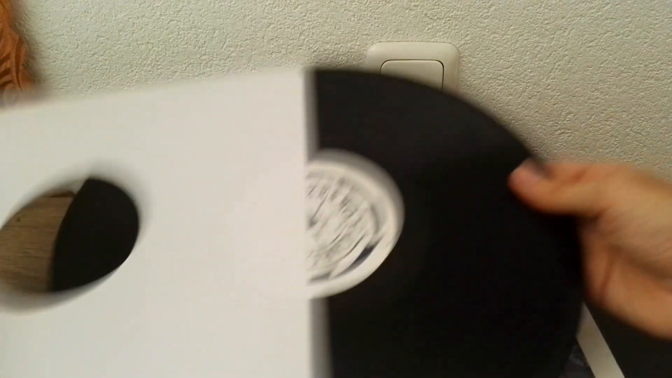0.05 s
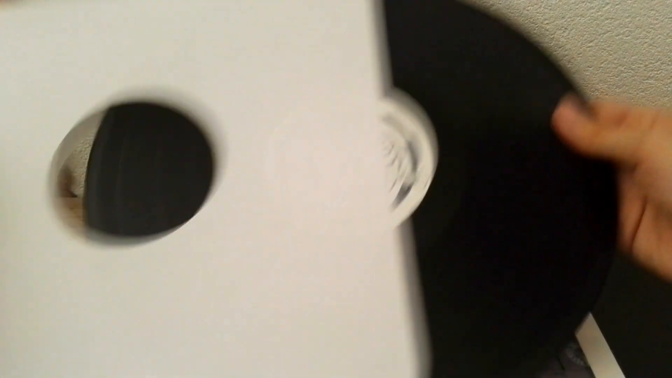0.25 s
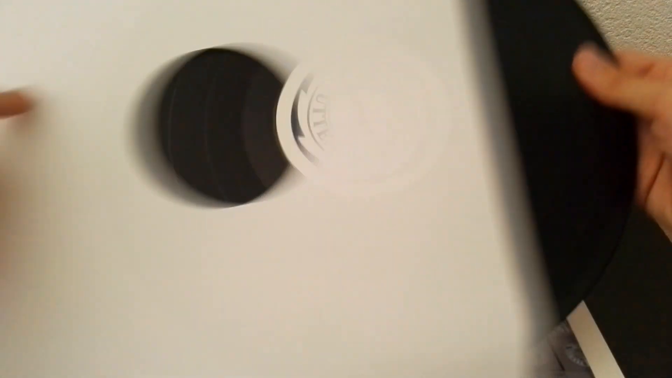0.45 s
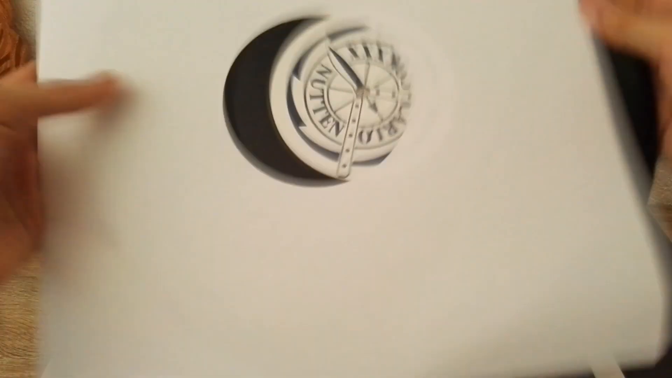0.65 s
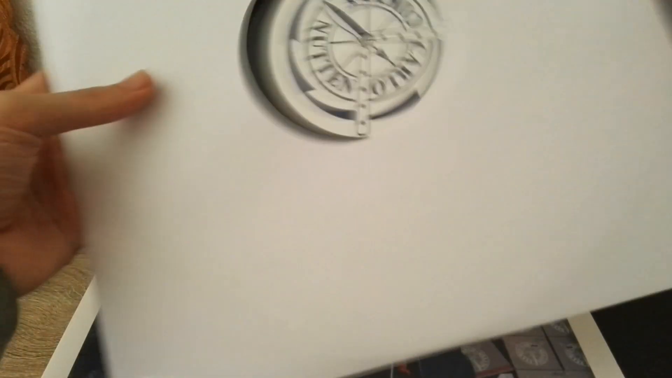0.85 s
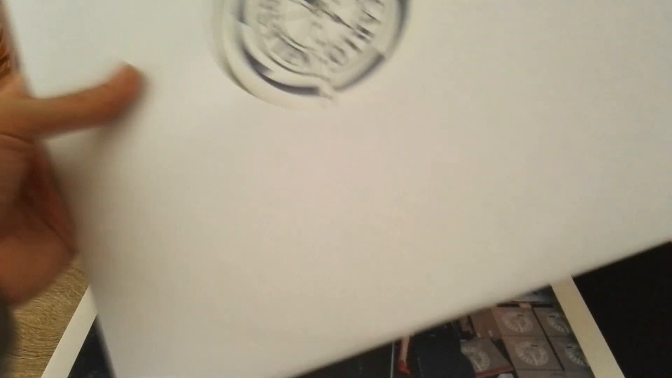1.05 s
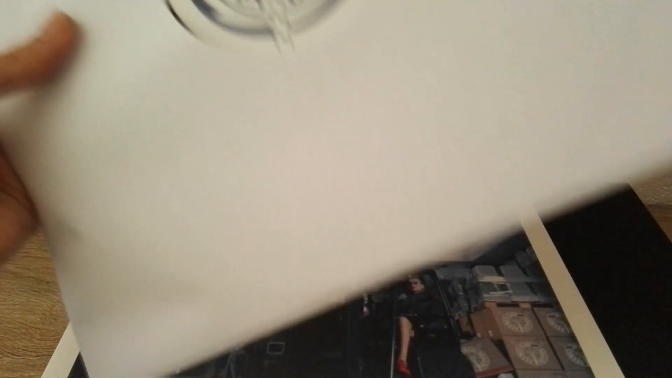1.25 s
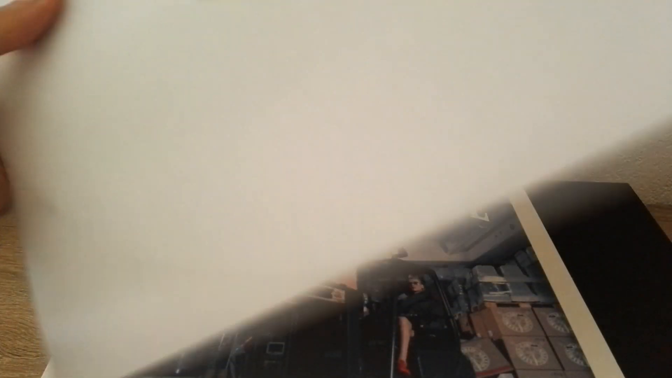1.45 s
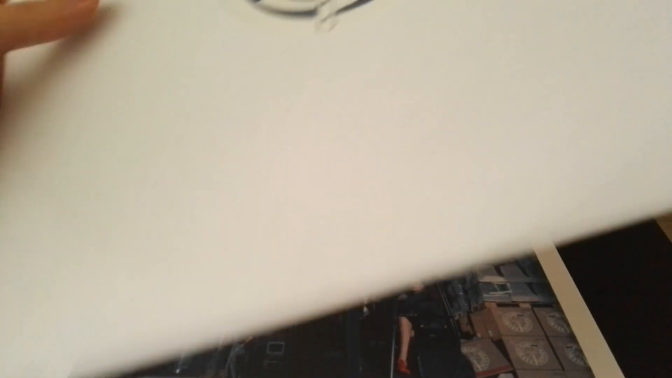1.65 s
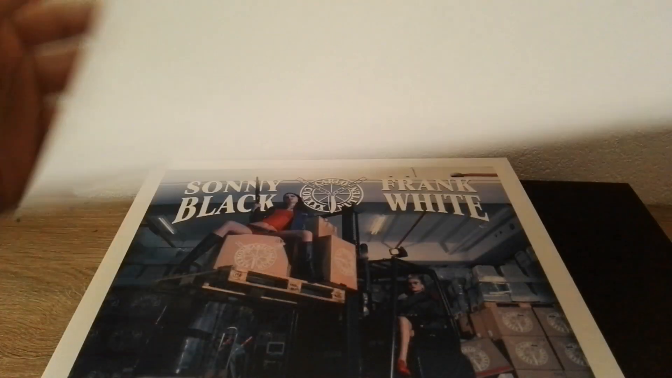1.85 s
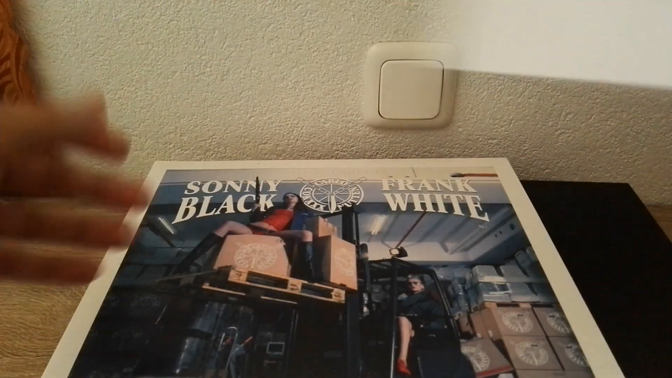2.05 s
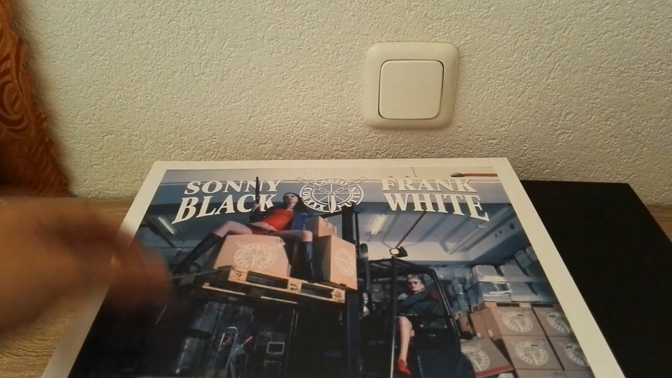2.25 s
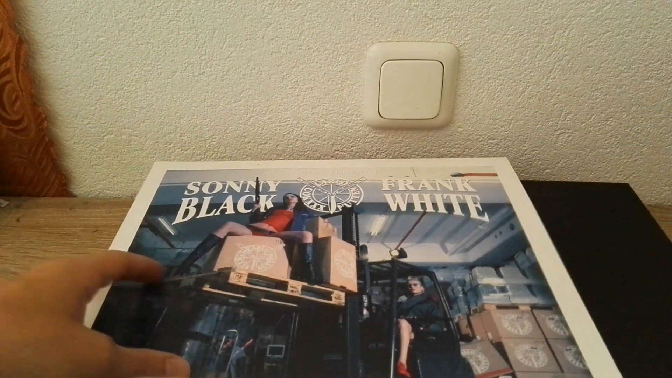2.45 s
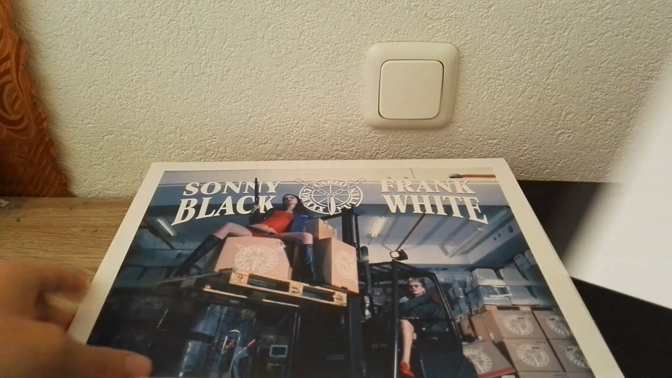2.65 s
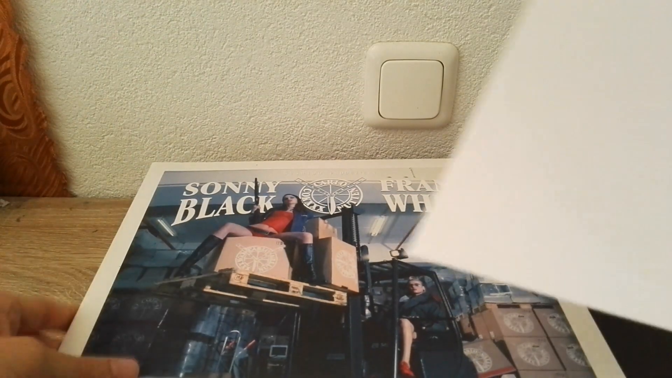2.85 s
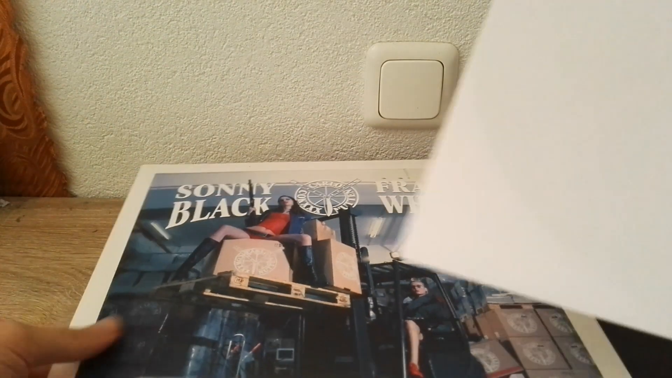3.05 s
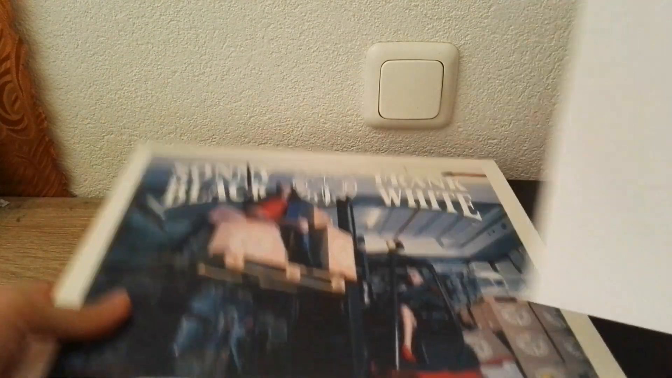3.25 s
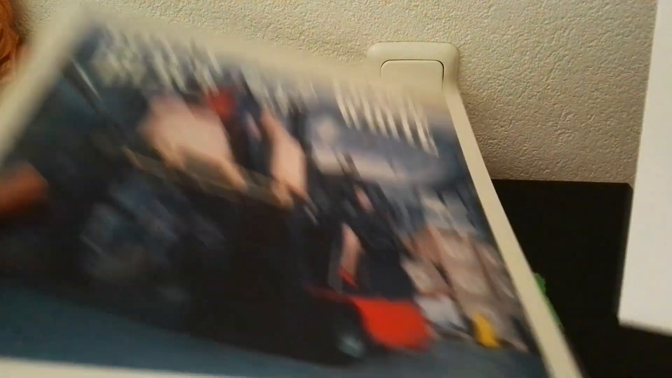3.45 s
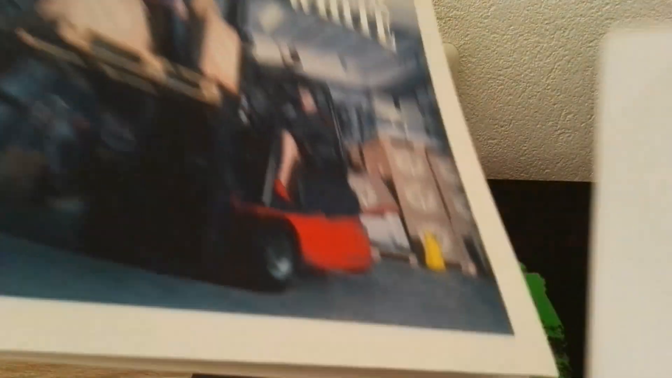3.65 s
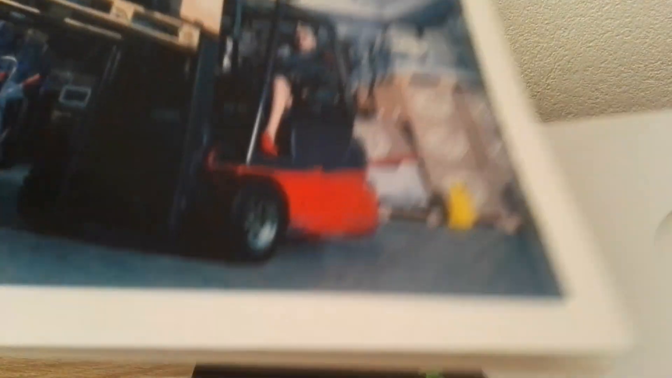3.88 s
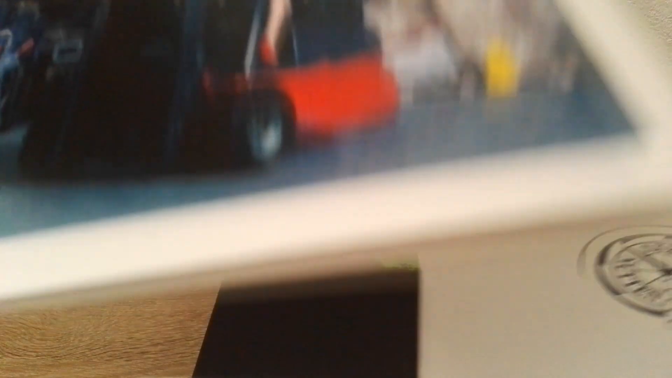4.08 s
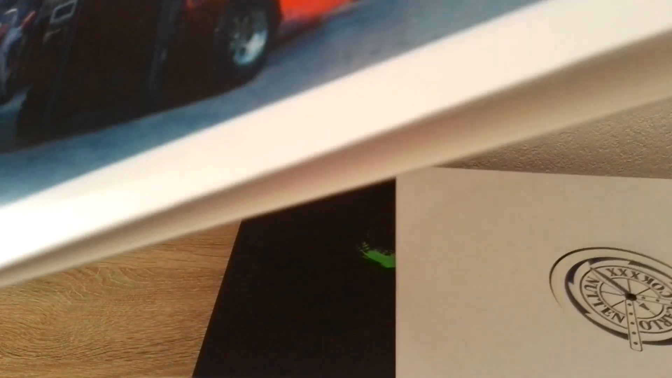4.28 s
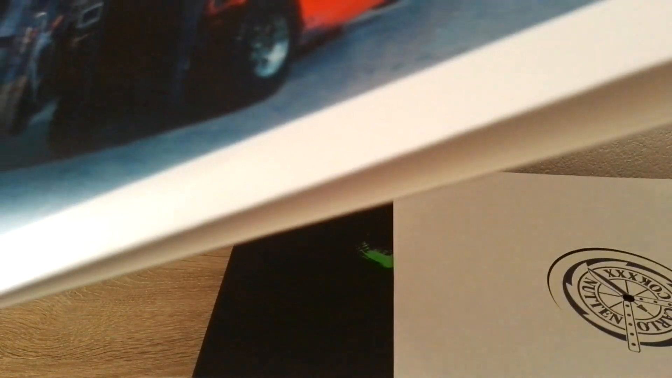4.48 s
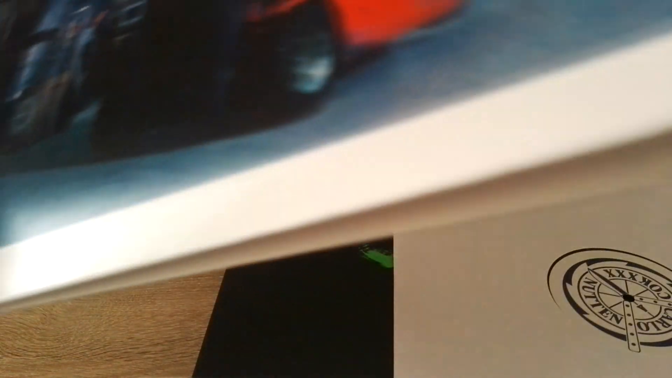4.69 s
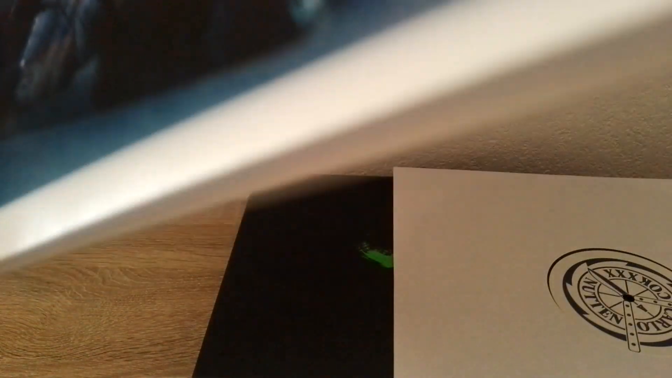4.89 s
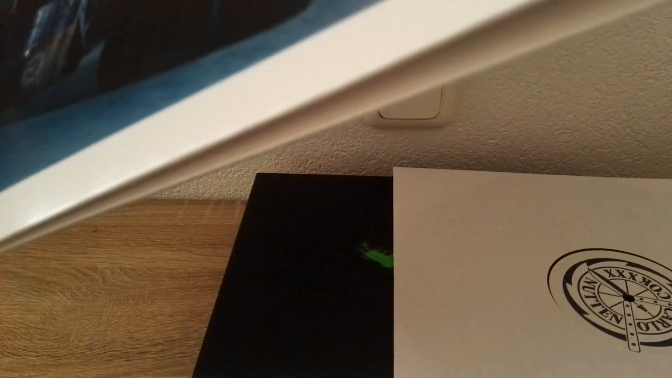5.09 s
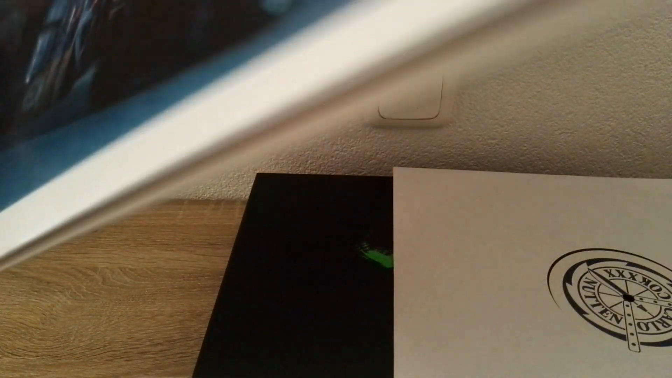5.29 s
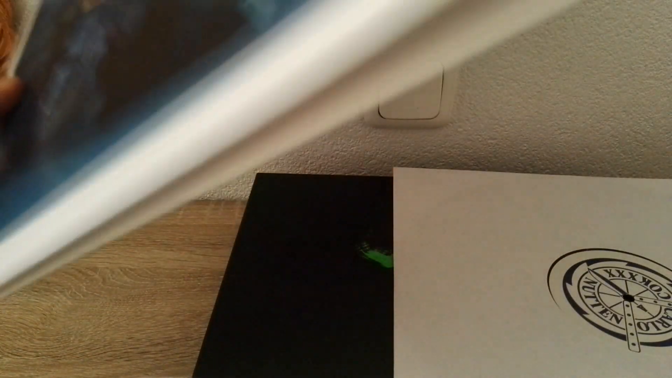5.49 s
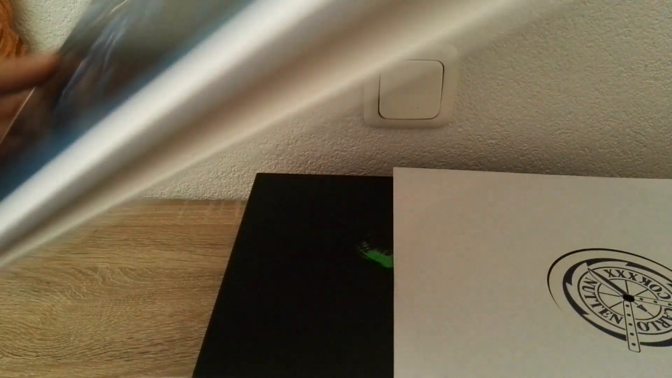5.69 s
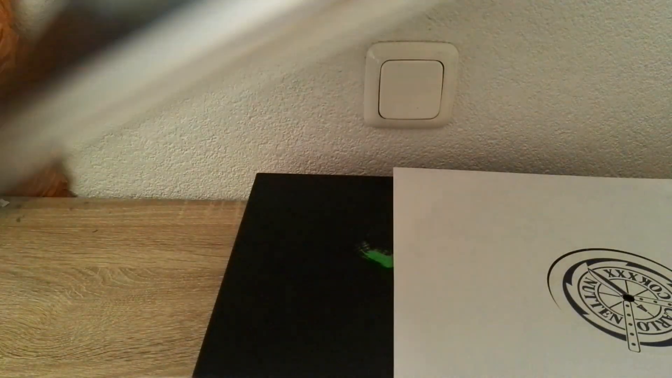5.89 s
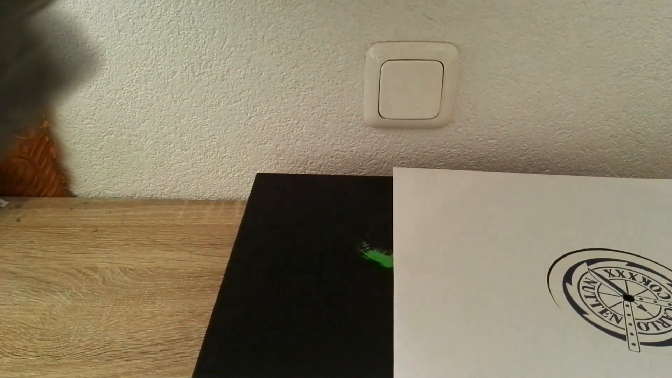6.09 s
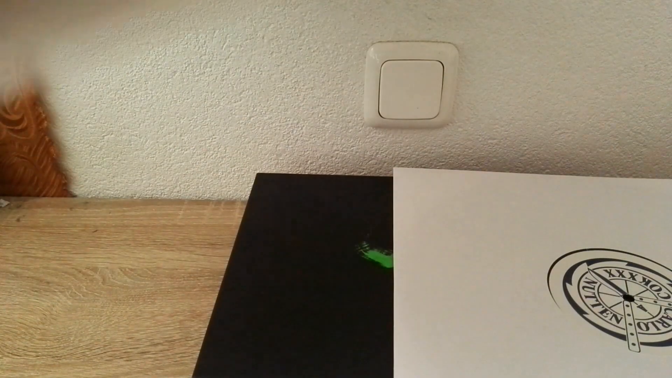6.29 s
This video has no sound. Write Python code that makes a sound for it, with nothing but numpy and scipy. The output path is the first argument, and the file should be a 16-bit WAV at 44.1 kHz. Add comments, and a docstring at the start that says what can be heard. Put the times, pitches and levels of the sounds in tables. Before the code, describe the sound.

Close papery sliding of a disc into a sleeve, then a stiff cover ticks and scrapes off a table, with light rustling and creaking.

```python
"""A papery hiss and rasp as a vinyl record slides into its sleeve, then a cardboard cover is picked up
from a table, the sleeve is laid down and the cover is pressed open, close to a mono microphone.
Rubbing is a stream of tiny random slips, coloured by each pair of surfaces. Sheets buckle in bursts of
slips, edges tick and scrape through resonances, bent card creaks in sparse cracks, bumps are decaying
low tones, and fanned air is rumbling noise. A small room adds reflections and a quiet tone."""
import sys
import numpy as np
from scipy import signal
from scipy.fft import rfft, irfft
from scipy.io import wavfile
from scipy.ndimage import uniform_filter1d

SR = 44100
rng = np.random.default_rng(int(sys.argv[2]) if len(sys.argv) > 2 else 0)


def inscribe(sig):
    """Save sig as 16-bit PCM at rate SR to the path in sys.argv[1].

    A 1-D sig is mono; a 2-D sig holds one channel per row.
    Samples are clipped to [-1, 1] before scaling.
    """
    pcm = np.round(np.clip(np.atleast_2d(sig).T, -1, 1) * 32767)
    wavfile.write(sys.argv[1], SR, pcm.astype(np.int16))


N = 279153
TIME = np.arange(N) / SR  # seconds
FREQ = np.maximum(np.fft.rfftfreq(N, 1 / SR), 1)  # Hz

# Colour of the quiet room. Each row: frequency in Hz, gain in dB.
ROOM_TONE_COLOUR = [(24, -51), (40, 1.5), (143, -3.5), (247, -6.5), (280, -10), (333, -11), (461, -12),
                    (591, -17), (1020, -16.5), (1680, -22), (15500, -32.5)]
# Colour of each pair of rubbing surfaces. Each row: frequency in Hz, gain in dB.
PAPER_ON_VINYL = [(140, -6), (220, -9), (300, -5), (420, -1.5), (540, -7), (700, -9.5), (1200, -14.5),
                  (2400, -9), (3600, -8.5), (5500, -13), (8300, -11), (10500, -16), (13200, -17.5),
                  (16000, -24.5)]
CARD_ON_TABLE = [(140, -7.5), (320, -5), (800, -9), (1300, -11.5), (1850, -8), (2150, -8), (2500, -10),
                 (3200, -7), (6200, -13), (9400, -13), (16000, -21.5)]
PAPER_ON_TABLE = [(140, 0), (280, 0), (480, -3), (750, -7.5), (1200, -9), (2800, -7.5), (5700, -10.5),
                  (7300, -10.5), (12900, -18.5), (16000, -26)]
SKIN_ON_CARD = [(140, 2), (300, 2), (600, -1), (1000, -6), (1400, -12.5), (1700, -15), (2100, -17.5),
                (3400, -17.5), (5500, -26), (8600, -29.5), (13000, -35), (16000, -40)]
# The long push of the disc into its sleeve, before the trims in slide().
# Each row: time in seconds, hiss of the fibres in dB, rasp of the edges in dB, drumming of the sheet in dB.
SLIDE = [(0.0, -58, -57, -51), (0.012, -59, -59.5, -63), (0.066, -50.5, -53.5, -62),
         (0.122, -57, -54.5, -54), (0.178, -45.5, -50.5, -45.5), (0.24, -51, -53, -51.5),
         (0.268, -47, -49.5, -45.5), (0.336, -43, -47, -56), (0.374, -42.5, -47.5, -47),
         (0.426, -50, -53, -51), (0.442, -41, -47.5, -43), (0.478, -48, -48, -46.5),
         (0.538, -40.5, -45.5, -54), (0.556, -42, -47, -39.5), (0.618, -47, -49, -56),
         (0.652, -50.5, -50, -50), (0.694, -60, -54, -57.5), (0.73, -60, -57, -57)]
# Colour of the moving air. Each row: frequency in Hz, gain in dB.
DRAUGHT_COLOUR = [(3, -36), (7, 1.5), (12, -4.5), (22, -4.5), (40, -15), (70, -31), (130, -27.5),
                  (260, -54)]
# Air fanned by a moving sheet or hand, before the trim in draught().
# Each row: time of the height in seconds, level in dB, half length (standard deviation) in seconds.
GUSTS = [(.11, -40, .08), (.38, -44, 0.25), (.9, -50, 0.21), (1.45, -50.5, 0.27), (2.354, -52, 0.18),
         (2.702, -50, 0.3), (3.14, -45, 0.12), (3.64, -56, 0.083), (4.72, -50, 0.057),
         (5.394, -50.5, 0.046), (5.72, -52.5, .25), (6.15, -54, .12)]
# Resonances of a held sheet. Each row: frequency in Hz, width in Hz, gain in dB.
SHEET_MODES = [(137, 39, -9), (186, 43, -7), (262, 34, 3.5), (306, 37, 1.5), (393.4, 24, 1.5), (439, 31, 1),
               (520, 120, -10.5), (660, 87, -1.5), (786, 44, -9.5)]
# Sheets buckling and flapping. Each row: time of the height in seconds, crackle in dB before the trim
# in buckles(), fall to 1/e in seconds, crackle centre in Hz, drumming in dB against the crackle.
BUCKLES = [(0.564, -46.5, .014, 400, 0), (.895, -47.5, .02, 418, 0), (.843, -33, 0.0095, 1850, 1.5),
           (.866, -30.5, .013, 2180, -5.5), (1.072, -36.5, 0.0036, 1330, -12),
           (1.087, -40.5, 0.0055, 1130, -2), (1.101, -45, .003, 350, 0), (1.157, -33.5, .005, 2040, -4),
           (1.188, -50.5, 0.015, 497, -1), (1.231, -32.5, 0.0045, 814, -16), (1.238, -36, .0025, 1450, 2.5),
           (1.434, -38.5, 0.0085, 1980, -19), (1.458, -38.5, .031, 1900, -0.5),
           (1.515, -55, 0.021, 520, -1), (2.024, -51, .024, 295, -10), (2.889, -54.5, 0.017, 3580, 2),
           (3.272, -41.5, .014, 3040, -22), (3.416, -47.5, 0.01, 630, -2), (3.923, -54, .012, 400, 0),
           (3.95, -42, 0.0036, 1220, 2), (3.963, -48, .025, 640, 1), (4.235, -50, .017, 700, 1),
           (4.689, -44.5, .0036, 3080, -5), (4.855, -49.5, .006, 1960, -2), (4.922, -45, .018, 2500, -10),
           (5.398, -47.5, 0.0083, 1310, -11), (5.444, -51, 0.0051, 1000, 6.5),
           (5.485, -53, .011, 1700, -10), (5.747, -48, 0.011, 1310, -0.5), (5.937, -54, .011, 1600, -12),
           (6.098, -53, .014, 2010, -2), (6.226, -55.5, .02, 260, -8)]
# Ring of the stiff cover. Each row: frequency in Hz, width in Hz, gain in dB.
COVER_MODES = [(1800, 170, 6.5), (2130, 110, 6), (2550, 170, 1), (3600, 430, -9)]
# Sharp ticks of edges and nails. Each row: start in seconds, peak in dB, pitch in Hz, reach of the band
# as a ratio up and down, time to fall 60 dB in seconds, gain of the cover's ring in dB.
TICKS = [(0.7596, -26.5, 5000, 3.2, 0.017, -28), (1.2245, -37, 8000, 1.8, .025, -32),
         (1.4012, -41, 4000, 2.2, 0.033, -30), (1.423, -32, 5930, 2, .02, -30),
         (2.263, -49.5, 1370, 1.4, .04, -18), (2.3388, -44, 2000, 1.9, .045, -4),
         (2.3902, -50, 5000, 2.2, .02, -8), (2.407, -43, 5000, 1.4, .029, -6),
         (2.5173, -37.5, 4540, 1.16, 0.025, -12.5), (2.8223, -37.5, 2060, 1.3, 0.026, 7),
         (3.115, -38.5, 4500, 4, 0.05, -6), (3.4076, -27, 4500, 2, 0.038, 8),
         (3.4178, -26, 2970, 4.3, 0.044, 4), (3.739, -44, 3140, 1.5, 0.068, -3),
         (4.6637, -46.5, 2200, 1.7, .029, -8), (4.6877, -36, 4500, 2.3, 0.08, -1),
         (4.712, -37.5, 3500, 2.2, 0.059, -3), (4.7794, -39, 4330, 1.9, 0.061, -2),
         (4.923, -36, 1740, 1.15, 0.018, -22), (4.9225, -30, 3300, 2.4, 0.023, -20),
         (5.03, -40, 3940, 2.3, 0.043, 2), (5.143, -43, 2940, 4, 0.055, -7),
         (5.2198, -42.5, 3700, 1.9, 0.037, -15), (5.382, -34, 3000, 2.5, 0.032, -13),
         (5.5245, -40, 2500, 3.3, .02, -6), (5.5563, -27, 4020, 2.3, .006, -12),
         (5.556, -39.5, 1220, 1.44, 0.037, -25), (5.7353, -24.5, 3500, 2.1, .018, -11),
         (5.736, -39, 1300, 1.3, .043, -18), (5.9307, -44, 3000, 2.3, 0.091, -15)]
# Short strokes of one surface over another. Each row: surface, start of full speed in seconds,
# hold, rise and fall in seconds, hiss in dB, rasp in dB, drumming in dB.
STROKES = [("disc", 0.77, .03, 0.018, .02, -42.5, -47, -54),
           ("disc", 0.8115, 0.032, .012, 0.02, -38.5, -46, -50),
           ("disc", 0.88, 0.042, .02, 0.1, -56, -52, -54.5),
           ("disc", 1.124, 0.024, 0.047, 0.034, -47.5, -49.5, -55.5),
           ("disc", 1.44, 0.031, 0.013, 0.025, -47, -48.5, -48),
           ("disc", 1.52, .03, .02, .1, -67, -62, -57),
           ("disc", 1.66, 0.017, 0.022, 0.02, -56.5, -63.5, -62),
           ("card", 2.28, .02, .02, 0.035, -66, -72.5, -71), ("card", 2.39, .05, .04, .03, -69, -74, -73),
           ("card", 2.55, .12, 0.04, 0.066, -58.5, -62.5, -65),
           ("card", 2.86, 0.056, 0.072, .03, -61.5, -65, -59.5),
           ("card", 2.975, .02, 0.031, .025, -60.5, -65.5, -70),
           ("card", 3.11, 0.086, 0.02, 0.022, -64.5, -61, -57),
           ("card", 3.25, 0.043, 0.015, .045, -49.5, -48, -59.5),
           ("card", 3.34, .09, 0.022, 0.066, -60.5, -55, -60),
           ("card", 3.565, .2, .03, .04, -86, -72, -65.5),
           ("sleeve", 3.945, 0.025, 0.011, 0.031, -48, -48, -47),
           ("sleeve", 4.04, .05, .04, .04, -56.5, -55, -63),
           ("sleeve", 4.14, .04, .02, .05, -56.5, -53, -57),
           ("sleeve", 4.23, 0.017, 0.017, 0.041, -54.5, -54.5, -54.5),
           ("sleeve", 4.35, 0.014, .015, 0.027, -58, -61.5, -59.5),
           ("hand", 4.89, 0.062, 0.037, 0.038, -63.5, -62, -69),
           ("hand", 5.23, .2, 0.095, .05, -71.5, -67.5, -69.5),
           ("hand", 5.51, 0.2, 0.064, 0.06, -62.5, -62, -65),
           ("hand", 5.95, 0.16, 0.022, .03, -69, -65.5, -68.5),
           ("hand", 6.125, 0.027, 0.018, 0.039, -58.5, -66, -66.5),
           ("hand", 6.25, .08, 0.059, .05, -63, -69, -70)]
# Dragged edges chattering at one pitch. Each row: time of the height in seconds, level in dB,
# half length (to 1/e) in seconds, pitch in Hz, width in Hz.
SCRAPES = [(.807, -34, 0.0043, 2950, 1800), (0.945, -69, .03, 2900, 900), (2.91, -58.5, 0.023, 4200, 900),
           (3.373, -59, 0.026, 4300, 1000), (2.402, -62, .014, 2180, 220), (3.465, -62, .035, 2150, 220),
           (4.01, -63, .045, 1030, 200), (3.599, -69, 0.096, 2150, 260), (3.62, -78, .06, 5740, 910),
           (4.11, -56.5, 0.1, 3000, 700)]
# Soft bumps of the hands and the cover. Each row: start in seconds, level in dB, pitch in Hz.
BUMPS = [(.85, -39, 165), (1.229, -46.5, 103), (1.44, -41, 72), (2.23, -41, 49), (2.279, -33, 38),
         (2.325, -36.5, 42), (3.109, -44, 45), (3.167, -41, 68.4), (3.413, -46.5, 109), (3.421, -37, 36),
         (3.943, -40.5, 137), (3.959, -43, 94), (4.24, -45, 132), (4.69, -42.5, 74), (4.93, -45.5, 65),
         (5.038, -40.5, 35), (5.381, -46.5, 100), (5.738, -48.5, 136.5), (6.099, -47, 129),
         (6.224, -50, 253)]
# Spells of faint creaking as the cover bends. Each row: start in seconds, end in seconds, rms level in dB.
CREAKS = [(2.247, 2.447, -74), (4.88, 5.0, -66), (5.21, 5.614, -63.5), (5.927, 6.12, -66)]


def undb(db):
    """Decibels to gain."""
    return 10 ** (np.asarray(db) / 20)


def unit(x):
    """Scale to rms 1."""
    return x / np.sqrt(np.mean(x ** 2))


def colour(x, points):
    """Filter by a smooth spectrum of (Hz, dB) points, joined along log frequency."""
    hz, db = np.transpose(points)
    gain_db = np.interp(np.log(FREQ), np.log(hz), db)
    return irfft(rfft(x) * undb(gain_db), N)


def band(x, lo_hz, hi_hz, order=3):
    """Band-pass between two edges."""
    return signal.sosfilt(signal.butter(order, [lo_hz, hi_hz], "band", fs=SR, output="sos"), x)


def ring(x, hz, width_hz):
    """One resonance, gain 1 at its centre."""
    return signal.lfilter(*signal.iirpeak(hz, hz / width_hz, fs=SR), x)


def resonate(x, modes):
    """Sum the bending resonances of a sheet or cover."""
    return sum(undb(db) * ring(x, hz, width) for hz, width, db in modes)


def walk(rate):
    """Smooth random wandering with a spread near 1, through a new point `rate` times a second."""
    return np.interp(TIME * rate, np.arange(N // 20), rng.standard_normal(N // 20))


def add(out, s, x):
    """Mix a short sound in at time s."""
    i = int(s * SR)
    out[i:i + len(x)] += x[:N - i]


def slips(rate, spread_db):
    """Fibres catching and letting go: random impulses per second, mostly tiny with a few larger ones."""
    size = undb(spread_db * np.minimum(rng.exponential(size=N), 5))
    happens = rng.random(N) < rate / SR
    direction = rng.choice([-1, 1], N)
    return unit(happens * size * direction)


def rub(levels_db, surface, slip_rate, spread_db, judder_db):
    """Countless fibres hiss; coarser slips of the edges rasp and drum; the grip is uneven."""
    grip_db = judder_db * walk(90)
    fine = colour(slips(25000, 4.1) * undb(grip_db / 2), surface)
    coarse = colour(slips(slip_rate, spread_db) * undb(grip_db), surface)
    hiss = band(fine, 6470, 19845)
    rasp = band(coarse, 1284, 6000)
    drumming = band(coarse, 143, 1400)
    return sum(unit(part) * undb(db) for part, db in zip((hiss, rasp, drumming), levels_db))


def room_tone(level_db=-62):
    """The steady murmur of the quiet room: coloured noise at one rms level."""
    return undb(level_db) * unit(colour(rng.standard_normal(N), ROOM_TONE_COLOUR))


def slide(trims_db=(0, -0.5, -1), stop_db_per_s=150):
    """Hiss, rasp and drumming in dB as the disc goes in and comes to rest."""
    s, *levels_db = np.transpose(SLIDE)
    stop_db = stop_db_per_s * np.maximum(TIME - s[-1], 0)
    return np.array([np.interp(TIME, s, db) + trim - stop_db for db, trim in zip(levels_db, trims_db)])


def draught(still_air_db=-58, trim_db=2):
    """Slow waves of air pushed against the microphone, swelling with each sweep of a sheet or hand."""
    air = unit(colour(rng.standard_normal(N), DRAUGHT_COLOUR))
    power = undb(still_air_db) ** 2  # the trim lifts still air and gusts alike
    for s, db, length in GUSTS:
        swell = np.exp(-((TIME - s) / length) ** 2 / 2)
        power = power + (undb(db) * swell) ** 2
    return air * np.sqrt(power) * undb(trim_db)


def buckles(slip_rate=9000, spread_db=0.5, span=1.6, rise_share=0.51, trim_db=-2.0):
    """A bending sheet lets go a swelling cluster of slips, which crackle and shake the whole sheet."""
    out, force = np.zeros(N), slips(slip_rate, spread_db)
    body = unit(band(resonate(force, SHEET_MODES), 83, 2040, order=2))
    for s, db, fall, hz, drum_db in BUCKLES:
        near = np.abs(TIME - s) < .25
        t = TIME[near] - s
        # the rise takes a share of the fall time
        swell = np.exp(np.minimum(t / (rise_share * fall), -t / fall))
        crackle = unit(band(force[near], hz / span, hz * span))
        out[near] += undb(db + trim_db) * swell * (crackle + undb(drum_db) * body[near])
    return out


def ticks(chatter=0.19, drum_db=-11, top_hz=10000):
    """One sharp impulse and a short chatter, coloured by the spot that is struck; the cover may ring on."""
    out, t = np.zeros(N), np.arange(SR // 6) / SR
    for s, db, hz, span, t60, ring_db in TICKS:
        impulse = 2 * (t == 0)
        force = chatter * rng.standard_normal(len(t)) * undb(-60 * t / t60) + impulse
        tick = band(force, hz / span, hz * span, order=2)
        tick = tick + undb(drum_db) * resonate(force, SHEET_MODES)
        tick = tick + undb(ring_db) * resonate(force, COVER_MODES)
        tick = band(tick, 110, top_hz)
        add(out, s, undb(db) * tick / np.abs(tick).max())
    return out


def strokes(surface):
    """Hiss, rasp and drumming in dB: all follow the speed of each stroke, which swells, holds and dies away."""
    power = np.full((3, N), 1e-14)  # silence between strokes
    for kind, s, hold, rise, fall, *levels_db in STROKES:
        if kind == surface:
            log_speed = np.minimum((TIME - s) / rise, (s + hold - TIME) / fall)
            speed = np.exp(np.clip(log_speed, -20, 0))
            power += np.outer(undb(levels_db) ** 2, speed ** 2)
    return 10 * np.log10(power)


def scrapes(slip_rate=2500, spread_db=2):
    """Stick and slip of a dragged edge excites one resonance of the card."""
    out, force = np.zeros(N), slips(slip_rate, spread_db)
    for s, db, length, hz, width in SCRAPES:
        swell = np.exp(-((TIME - s) / length) ** 2)
        tone = unit(ring(ring(force, hz, width), hz, 2 * width))
        out += undb(db) * swell * tone
    return out


def bumps(contact_s=0.0016, t60=0.18):
    """Soft pushes set the table and the cover swaying: low sines with a soft onset and a quick decay."""
    out, t = np.zeros(N), np.arange(SR // 2) / SR
    onset = 1 - np.exp(-t / contact_s)
    for s, db, hz in BUMPS:
        add(out, s, undb(db - 60 * t / t60) * np.sin(2 * np.pi * hz * t) * onset)
    return out


def creaks(slip_rate=90, spread_db=2, lo_hz=950, hi_hz=3200, chatter_s=0.0036):
    """Bent card gives way in sparse, irregular cracks, each with a brief chatter."""
    t = np.arange(SR // 20) / SR
    cracks = signal.fftconvolve(slips(slip_rate, spread_db), np.exp(-t / chatter_s))[:N]
    chatter = cracks * rng.standard_normal(N)
    bending = sum(undb(db) * ((TIME > start) & (TIME < end)) for start, end, db in CREAKS)
    soft_edged = uniform_filter1d(bending, size=1000)  # samples
    return unit(band(chatter, lo_hz, hi_hz, order=2)) * soft_edged


def room(x, t60=0.45, treble_share=0.88, tail_db=-10, treble_db=-8, early_db=-13, early_s=0.011):
    """Faint reflections from the table and the wall, then the short tail of a furnished room."""
    t = np.arange(SR // 2) / SR
    low, high, early = rng.standard_normal((3, len(t)))
    low = band(low, 81, 5800, order=1) * undb(-60 * t / t60)
    high = band(high, 4400, 14000, order=1) * undb(treble_db - 60 * t / (t60 * treble_share))
    tail = (low + high) * (t > .008)
    early = band(early, 130, 6000, order=1) * np.exp(-t / early_s) * (t > .002)
    response = undb(tail_db) * unit(tail) + undb(early_db) * unit(early)
    # this scaling puts the energy of tail and early part 3 dB below their settings, against the direct sound
    return x + signal.fftconvolve(x, response / np.sqrt(2 * len(t)))[:N]


def scene():
    """Four pairs of surfaces rub, with buckles, creaks, ticks and bumps, the same in both channels."""
    disc = np.maximum(slide(), strokes("disc"))
    rubbing = (rub(disc, PAPER_ON_VINYL, slip_rate=14000, spread_db=2.5, judder_db=2.0)
               + rub(strokes("card"), CARD_ON_TABLE, slip_rate=6000, spread_db=2.5, judder_db=3.0)
               + rub(strokes("sleeve"), PAPER_ON_TABLE, slip_rate=9000, spread_db=3.0, judder_db=1.6)
               + rub(strokes("hand"), SKIN_ON_CARD, slip_rate=2500, spread_db=2.5, judder_db=4.0))
    quiet = room_tone()
    handling = rubbing + scrapes() + buckles() + creaks() + ticks()
    mono = room(handling) + bumps() + draught() + quiet
    return np.array([mono, mono])


def record(dry, top_hz=15900):
    """The recorder cuts the top with a steep low-pass."""
    return signal.sosfilt(signal.ellip(10, .2, 70, top_hz, fs=SR, output="sos"), dry)


dry = scene()
out = record(dry)
inscribe(out)
```